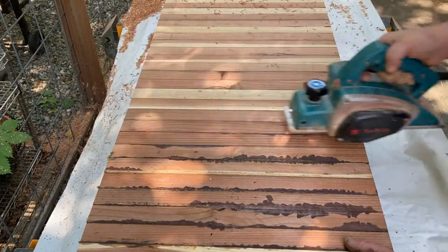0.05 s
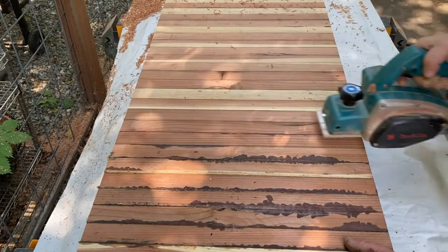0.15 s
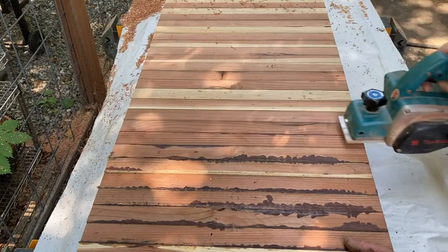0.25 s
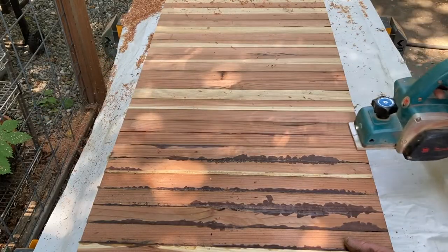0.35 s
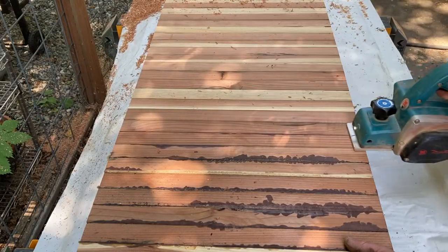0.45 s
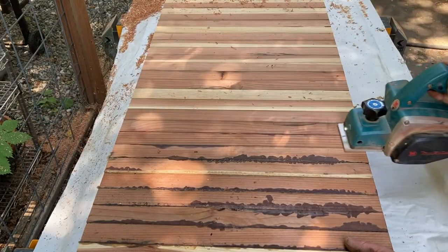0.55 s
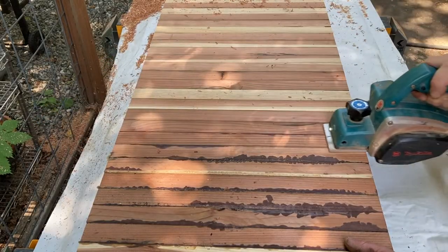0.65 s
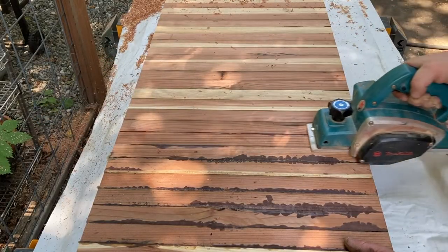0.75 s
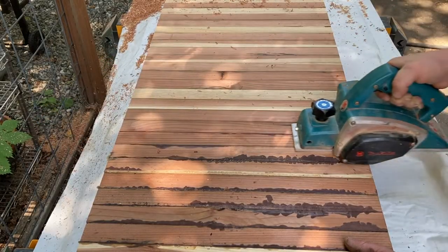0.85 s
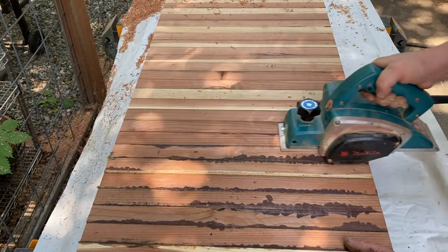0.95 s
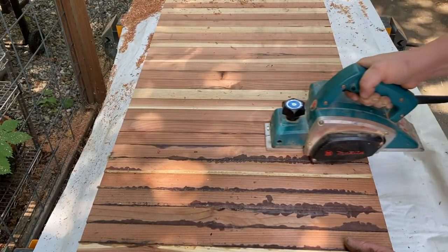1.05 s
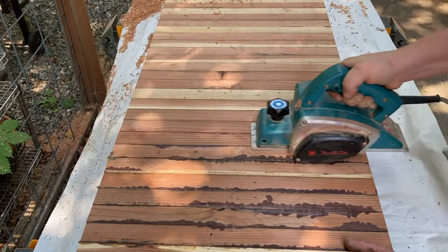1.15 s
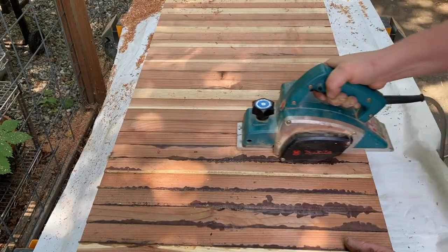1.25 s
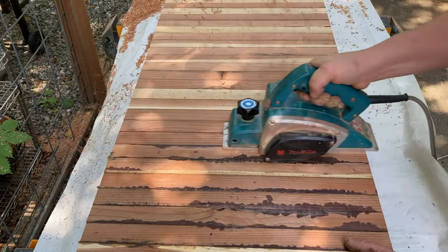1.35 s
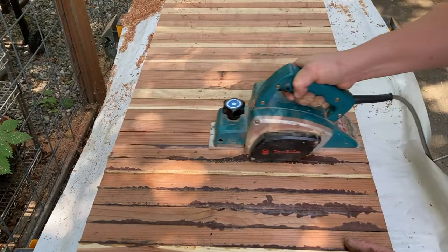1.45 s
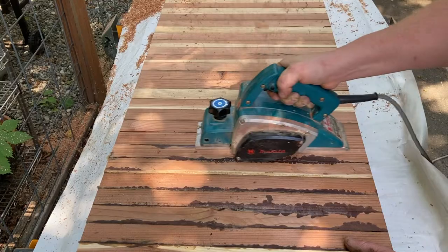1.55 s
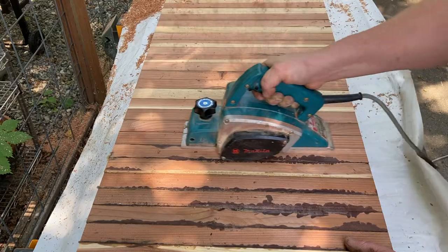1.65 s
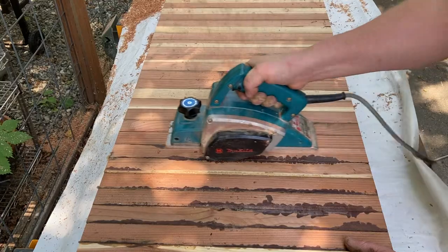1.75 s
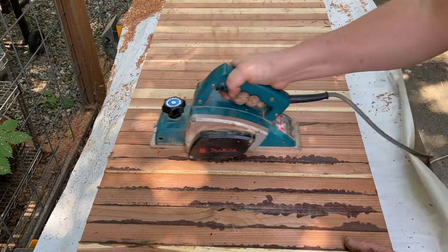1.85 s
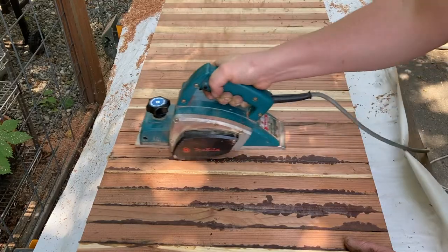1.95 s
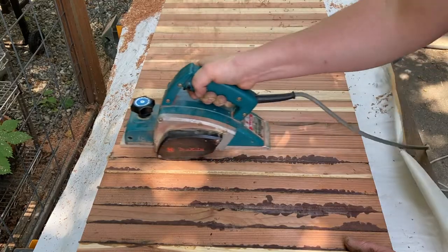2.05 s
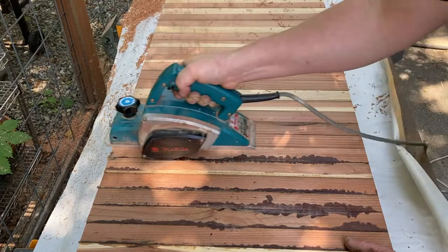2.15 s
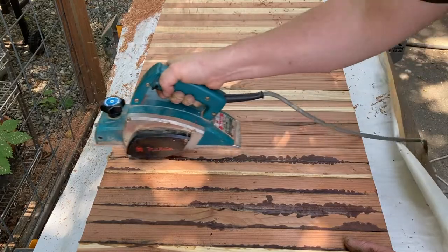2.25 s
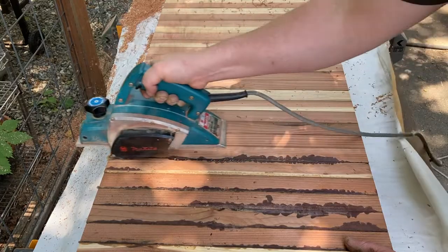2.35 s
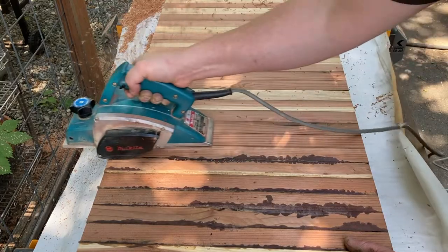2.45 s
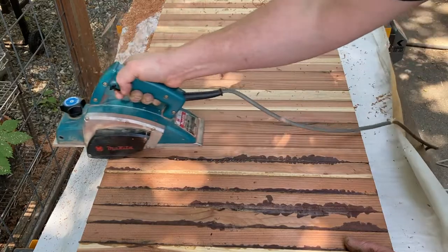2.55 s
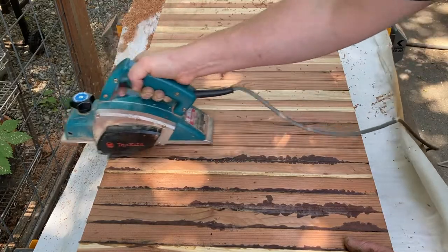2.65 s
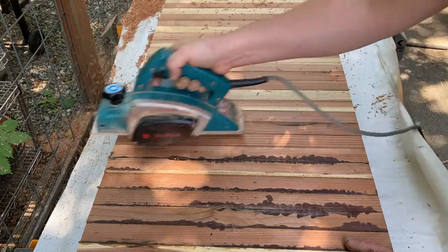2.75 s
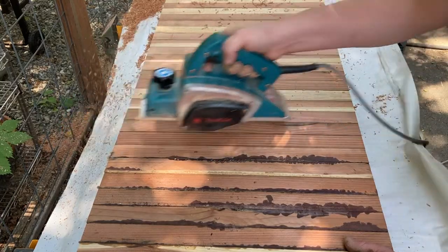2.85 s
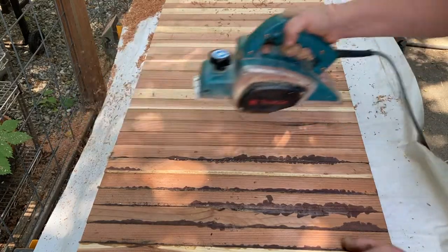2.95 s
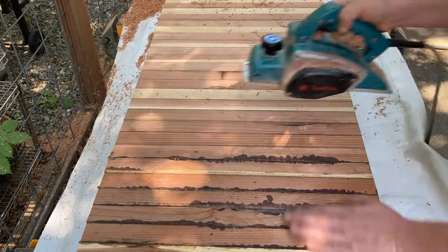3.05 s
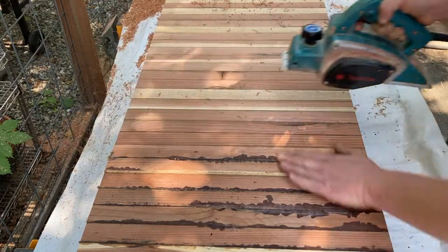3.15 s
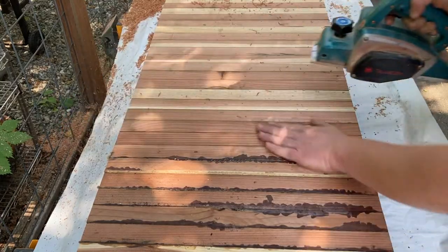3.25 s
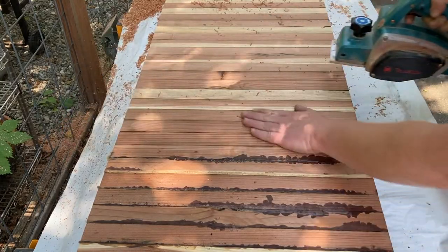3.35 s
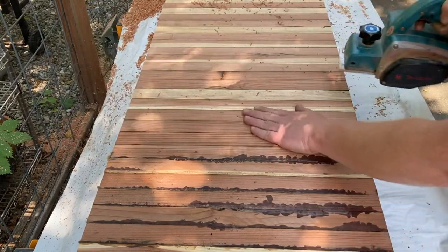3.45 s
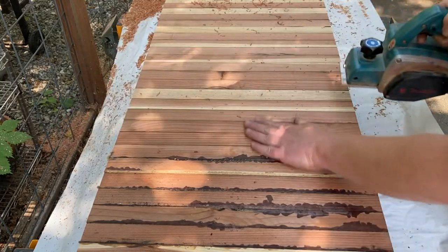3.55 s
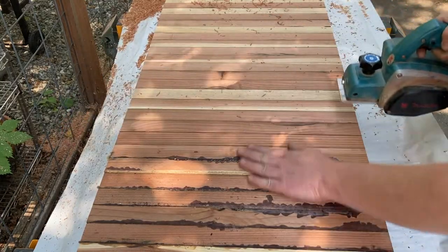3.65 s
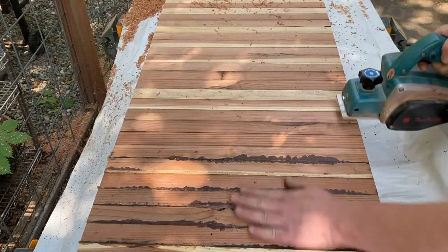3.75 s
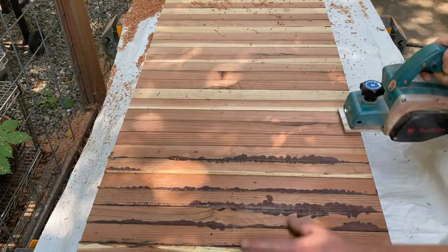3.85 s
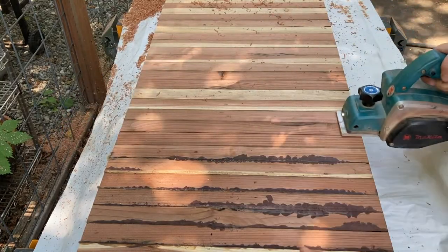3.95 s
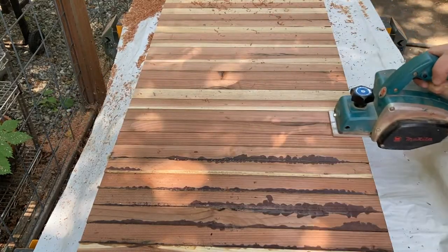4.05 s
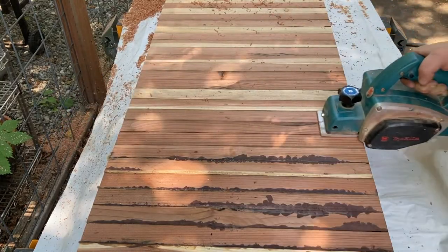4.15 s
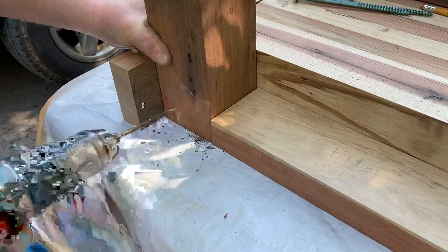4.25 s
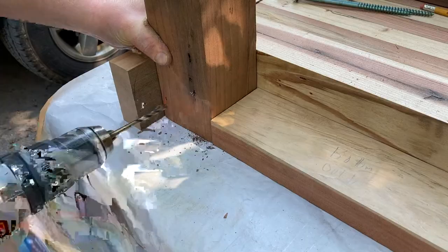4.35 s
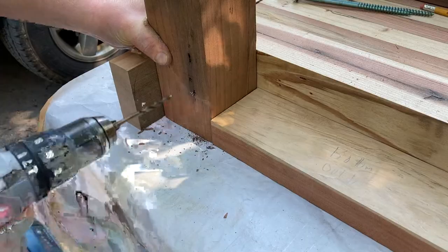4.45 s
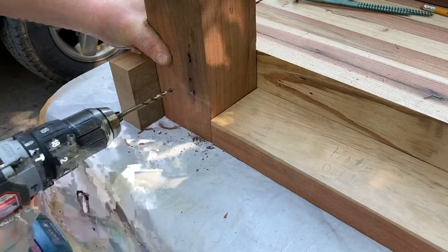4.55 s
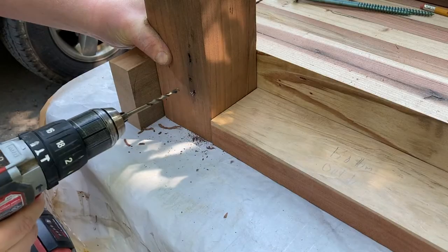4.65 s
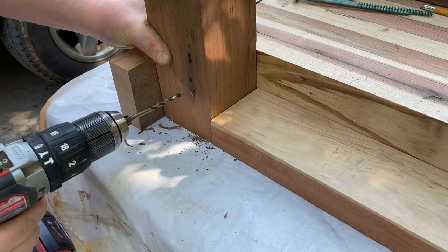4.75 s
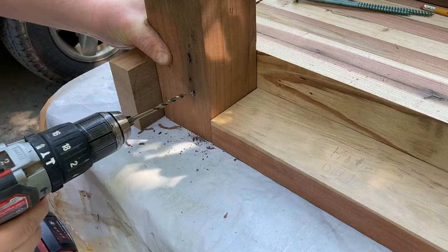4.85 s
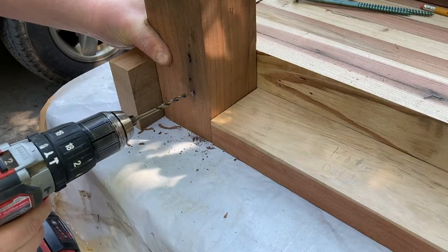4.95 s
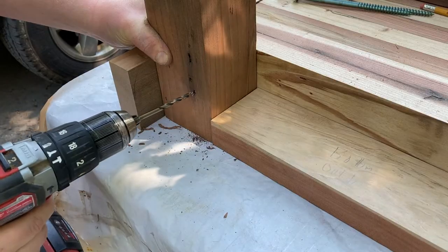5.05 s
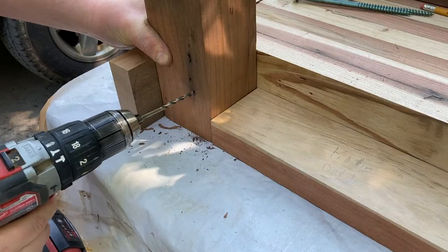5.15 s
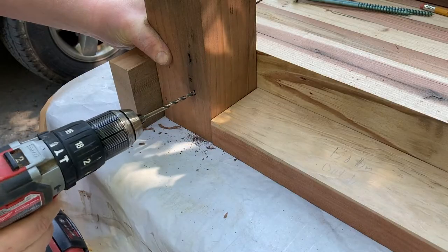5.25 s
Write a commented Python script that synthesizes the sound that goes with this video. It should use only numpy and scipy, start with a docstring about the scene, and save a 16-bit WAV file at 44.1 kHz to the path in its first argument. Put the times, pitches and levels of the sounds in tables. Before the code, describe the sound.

Close stereo pickup outdoors with faint low rumble. An electric planer is already spinning down, is switched on and rises to a steady buzzing whine, then cuts wood with a loud bright rasp for nearly two seconds. It leaves the plank, coasts downward in pitch, and revs briefly with a throbbing squeal before an abrupt cut to a drill braking in rapid metallic clicks.

```python
"""Hand planer and braking drill outdoors

A hand planer coasts, is switched on, shaves across a plank, coasts and is briefly powered again.
Two knives on its drum chop air and wood as harmonics of the drum's rotation; its belted motor hums
and whines at multiples of the shaft speed, and its fan is coloured noise. Then a cordless drill brakes
to a halt: gear tones sink, noise whirrs, and knocks excite damped modes of the chuck.
Filtered noise makes the far rumble, which is left at the end."""
import sys
import numpy as np
from scipy import signal
from scipy.fft import rfft, irfft
from scipy.io import wavfile
from scipy.ndimage import uniform_filter1d

SR = 44100
rng = np.random.default_rng(int(sys.argv[2]) if len(sys.argv) > 2 else 0)


def wav_out(sig):
    """Save sig, one row per channel (or a flat mono array), as 16-bit PCM at SR to the path in sys.argv[1]."""
    wavfile.write(sys.argv[1], SR, np.round(np.clip(np.atleast_2d(sig).T, -1, 1) * 32767).astype(np.int16))


N = 234345
T = np.arange(N) / SR  # time in seconds

# Far rumble. Each row: time in seconds, level in dB.
RUMBLE_LEVEL = [(0, -76), (.6, -69.5), (2.9, -74), (3.3, -68.5), (3.9, -69), (4.2, -65), (4.301, -64),
                (5.31, -63.5)]
# Colour of the open air. Each row: frequency in Hz, relative density in dB.
OUTDOORS_COLOUR = [(20, -44), (35, -16), (60, -2), (85, 3.5), (120, -6), (160, -13.5), (250, -29),
                   (500, -36), (1000, -43), (2000, -50), (3500, -67), (6000, -74), (16000, -85)]

# Drill running down. Each row: time in seconds, whirr level in dB.
DRILL_WHIRR = [(4.276, -46), (4.335, -46), (4.362, -46), (4.376, -54), (4.385, -50), (4.408, -49),
               (4.42, -51), (4.44, -49), (4.45, -70), (4.6, -93), (4.8, -110)]
# Colour of the whirr. Each row: frequency in Hz, relative density in dB.
WHIRR_COLOUR = [(120, -51.5), (200, -7), (659, -10), (1500, -7.5), (2470, -6), (4600, 1), (8420, -5.5),
                (9060, -2), (10300, 3), (14600, -9), (16000, -21)]
# Gear partials. Each row: multiple of the tooth-mesh frequency, level in dB.
GEAR_PARTIALS = [(1, -66), (2, -65), (3, -62), (4, -54), (6, -54), (8, -59)]
# Gear knocks and ticks. Each row: start in seconds, relative strength in dB, nominal pitch in Hz.
GEAR_KNOCKS = [(4.342, -39, 6000), (4.354, -45, 5000), (4.358, -39, 3500), (4.383, -46, 5000),
               (4.391, -47, 4500), (4.402, -46, 8000), (4.411, -46, 4000), (4.415, -46, 10500),
               (4.424, -46, 5000), (4.431, -44, 7000), (4.438, -47, 7000), (4.489, -65, 10000),
               (4.553, -75, 9000), (4.562, -75, 9000), (4.606, -80, 8500), (4.633, -83, 6500),
               (4.642, -70, 11500), (4.667, -77, 10000), (4.761, -69, 10500)]
# Modes of the chuck. Each row: frequency in Hz, level in dB relative to the knock, 60 dB decay in seconds.
CHUCK_MODES = [(4550, -4, .13), (8300, -4, .05), (10000, -24, .2), (10800, -23, .4), (13100, -3, .05),
               (3600, -20, .02)]
MESH_HZ, MESH_SAG_HZ_PER_S = 1798, 1067  # tooth mesh at the start, and its fall
GEARS_STOP_S = 4.342
BRAKE_S = (4.385, 4.45)  # only the knocks of the final stop ring the chuck
THUD_HZ, THUD_DB, THUD_S = (250, 1800), 2, .005  # housing thump: range, gain before its filter, decay time

# Drum. Each row: time in seconds, turns per second, once-a-turn shake in dB, fan hiss in dB.
DRUM_MOTION = [(0, 232.4, -98, -49), (.4, 207, -79, -49), (.512, 198, -57.5, -48),
               (.59, 214.6, -47.5, -46.5), (.794, 240, -47, -45.5), (.85, 245.5, -43, -40.5),
               (1.0, 250, -37.5, -41.5), (1.2, 251.4, -43, -39.5), (1.33, 249.8, -51.5, -42),
               (1.7, 242.6, -51.5, -43), (2.345, 228.5, -65, -46.5), (2.555, 223, -73, -50),
               (2.585, 229.5, -64, -50), (2.615, 232.5, -70, -50.5), (2.94, 213.7, -80.5, -47.5),
               (3.4, 187, -79, -51), (3.962, 160.7, -74.5, -51.5), (4.065, 180, -66.5, -49.5),
               (4.16, 203, -47, -48.5), (4.28, 224, -50, -47)]
# Colour of the fan. Each row: frequency in Hz, relative density in dB.
FAN_COLOUR = [(59, -58.5), (100, -41), (239, -12.5), (398, -4), (621, -8.5), (836, -20), (930, -14.5),
              (1310, -13.5), (2040, -15.5), (3500, -17.5), (5300, -14), (7000, -19), (9210, -15),
              (10700, -14.5), (16000, -21)]
# Knife partials. Each row: multiple of the drum speed, dB over the fan in free air before the speed law,
# dB over the sole's ring in the wood.
KNIFE_PARTIALS = [(2, -2, -39), (3, -21, -19.5), (4, -12.5, -15), (6, -11, -23), (8, -17, -5.5),
                  (10, -21, 1), (12, -35.5, -5), (14, -29.5, -8), (16, -28, -4.5)]
# Faint wavering drum partials. Each row: multiple of the drum speed, dB over the fan.
FAINT_PARTIALS = [(24, -45), (32, -32)]
# Drum, motor and cut partials swell or sink briefly around a given time and pitch.
# Each row: centre in seconds, centre in Hz, Gaussian spread in seconds, peak change in dB.
TONE_SWELLS = [(0.06, 1318, 0.026, 18), (0.182, 1718, 0.1, 12.5), (0.725, 690, 0.12, 16.5),
               (0.907, 1982, 0.07, -8.5), (0.924, 2500, .06, 1), (0.925, 2950, 0.081, -8),
               (1.071, 6360, 0.069, 12), (0.893, 4170, 0.028, 7), (0.902, 6760, 0.047, -3.5),
               (1.399, 5800, .1, -5), (1.559, 7100, 0.079, 2.5), (2.385, 3230, 0.085, 2),
               (2.781, 5500, .13, 14), (3.298, 5750, 0.087, 10), (3.75, 5200, .17, 8),
               (0.096, 920, 0.11, 6.5), (2.0, 4370, 0.23, -8), (2.532, 2120, 0.035, 1),
               (2.538, 2840, 0.048, -1), (3.2, 3300, .05, 18), (1.0, 496, 0.65, -5),
               (1.157, 1520, 0.15, -13.5), (1.193, 2300, 0.14, -13.5), (1.3, 3570, 0.081, -21.5),
               (1.26, 1260, 0.071, 11.5), (1.323, 3043, 0.36, 8.5), (1.33, 10600, 0.031, 5),
               (1.497, 11100, 0.02, 9), (1.92, 10600, 0.0426, 7.5), (1.887, 1440, 0.14, 3),
               (1.847, 912.4, 0.18, -19), (1.855, 3107, 0.2, 14.5), (1.862, 1620, 0.21, 12),
               (2.092, 2700, 0.091, -20), (2.366, 1370, 0.16, 13.5), (2.43, 6600, 0.077, 10),
               (2.514, 10400, 0.034, 11), (2.2, 3700, 0.14, -6), (2.298, 2320, 0.19, -13),
               (2.46, 1548, 0.14, -16), (2.46, 1940, 0.2, 8.5), (2.83, 1800, 0.044, 10),
               (2.833, 1325, 0.1, 12.5), (2.98, 854.7, 0.19, 11), (3.119, 2820, .16, 18.5),
               (3.1, 1568, 0.25, 13), (3.201, 2410, 0.16, 12), (3.55, 2195, 0.16, 15.5),
               (3.699, 2400, 0.22, 9), (3.238, 1180, 0.08, 13.5), (4.125, 1090, 0.18, 8),
               (4.22, 643, 0.23, 13)]
SWELL_OCTAVES = 0.065  # Gaussian spread in pitch
MUFFLE_DB = -4  # the plank covers the open sole and damps the fan
CHOP_DB_PER_OCTAVE = 7.5  # a slower drum chops the air more softly

# Trigger held. Each row: on in seconds, off in seconds, initial throb depth (0-1), initial squeal in dB.
TRIGGER_PULLS = [(.52, 2.62, .2, 0), (3.976, 4.3, 1., 18)]
# Motor whine. Each row: time in seconds, dB over the fan before the starting squeal.
WHINE_LEVEL = [(0, -20), (.1, -14), (.18, -15), (.24, -5), (.45, -8), (.5, -16), (.55, -6), (.68, -6),
               (.8, -11), (.9, -16), (2.57, -18), (2.6, -3), (2.7, -4), (2.82, -12), (2.93, -7), (3.0, -15),
               (3.15, -11), (3.5, -11), (3.7, -8), (3.9, -11), (3.96, -16), (4.0, -11), (4.07, -14),
               (4.12, -10), (4.2, -14), (4.28, -9)]
# Faint motor partials. Each row: multiple of the shaft speed, dB over the fan.
SHAFT_PARTIALS = [(7, -28), (14, -28), (17, -26)]
BELT, SLOTS = 1.742, 12  # motor turns per drum turn before slip, armature slots
SLIP_COAST, SLIP_DRIVEN, SLIP_START = .8, .3, -1.5  # shaft-speed offset in %; the last is per unit of throb
GRIP_S, SQUEAL_S = .13, .075  # settling times of throb and squeal
HUM_DB, HUM_DRIVEN_DB, HUM_RISE_S = -71.5, 17.5, .2  # coasting hum, gain at full power, time constant
THROB_HZ = 120  # twice the mains

# Knives in the wood. Each row: time in seconds, then dB of the plank's knock, of the sole's ring
# and of the edge's snap, all before the tone shaping below.
CUT_LEVELS = [(.841, -73, -46, -36.5), (.92, -77, -44, -42.5), (1.08, -54, -43, -42),
              (1.33, -42.5, -42, -41), (1.5, -39, -47, -42), (1.65, -48.5, -47, -44),
              (1.92, -57, -48, -41.5), (2.05, -50.5, -50, -42.5), (2.19, -40, -55, -45.5),
              (2.33, -53, -49, -41), (2.42, -44, -50, -41), (2.5, -47.5, -45.5, -42),
              (2.559, -50, -45.5, -40.5)]
# Centres of those three ranges, in Hz.
CUT_CENTRES_HZ = [1000, 3900, 7000]
# Tone of the blows. Each row: frequency in Hz, gain in dB.
CUT_COLOUR = [(600, -17), (1500, 5.5), (2200, 11), (3000, -1), (3600, 4.5), (4500, 0), (5200, 0.5),
              (6000, -2.5), (8500, 0.5), (11000, 4), (13500, 0), (15800, -4)]
# Imbalance of the knives. Each row: frequency in Hz, second knife's share of the first one's blow.
SECOND_KNIFE_SHARE = [(600, .5), (2000, .65), (3600, .55), (4500, .2), (6000, .25), (8000, .1), (15000, .1)]
# Colour of flying chips. Each row: frequency in Hz, relative density in dB.
CHIPS_COLOUR = [(200, -13.5), (400, 0), (900, -2), (1500, -5.5), (2200, -2.5), (3500, -10.5), (5000, -10),
                (6000, -13), (7500, -7), (10000, 2.5), (16000, -15)]
# The sole chatters as it leaves the plank: time constant, turns of jitter, dB of scatter between blows.
EXIT_S, EXIT_JITTER, EXIT_DB = .05, .003, 3
PATCHY_DB, CHIPS_DB = 2.0, -9.0  # scale of the partials' random flicker; chips relative to the edge's snap

# Phase between the two ports. Each row: frequency in Hz, turns by which the right leads.
PORT_PHASE = [(4000, .3), (4650, .37), (5450, .5), (6700, .97), (7490, 1.08), (9200, 1.5), (11200, 2),
              (13600, 2.5), (15400, 3)]
SPLIT_HZ, TOP_HZ = 4800, 15900  # middle of the crossover into shared treble, top cutoff


def undb(db):
    """Decibel law: convert a level to an amplitude gain."""
    return 10 ** (np.asarray(db) / 20)


def read(table, edge_s=0.0015):
    """Linear interpolation: columns of a curve at every sample, and a gate open while it lasts."""
    s, *columns = np.transpose(table)
    opening = (T - s[0]) / edge_s + (s[0] <= 0)  # already open if the curve starts at zero
    closing = (s[-1] - T) / edge_s + 1
    gate = np.clip(np.minimum(opening, closing), 0, 1)
    return [np.interp(T, s, c) for c in columns], gate


def at_hz(hz, points):
    """Logarithmic pitch scale: interpolate a spectrum on a log-frequency axis."""
    f, values = np.transpose(points)
    return np.interp(np.log(np.maximum(hz, 1)), np.log(f), values)


def walk(rate, count=1, size=N):
    """Slow random modulation: normal levels held for 1 / rate s, slewed by a moving average."""
    hold = int(SR / rate)
    levels = rng.standard_normal((count, size // hold + 1))
    return 1.15 * uniform_filter1d(np.repeat(levels, hold, 1), hold)[:, :size]


def hiss(points, wide_hz):
    """Spatial coherence: a coloured noise pair of rms 1, alike in the bass and unrelated well above wide_hz."""
    hz = np.fft.rfftfreq(N, 1 / SR)
    mid, side = rfft(rng.standard_normal((2, N))) * undb(at_hz(hz, points))
    side = side * (0.061 + hz ** 2 / (hz ** 2 + wide_hz ** 2))
    pair = irfft(np.array([mid + side, mid - side]), N)
    return pair / np.sqrt(np.mean(pair ** 2))


def tone(turns, db, pan_db):
    """Simple harmonic motion: a sine of rms level db, louder on the left by pan_db."""
    balance_db = np.array([[.5], [-.5]]) * pan_db
    return np.sqrt(2) * np.cos(2 * np.pi * turns) * undb(db + balance_db)


def swell(t, hz, step=256):
    """Selective gain: Gaussian patches in time and log pitch, in dB, for a tone of pitch hz at times t."""
    s, centre, spread_s, db = np.transpose(TONE_SWELLS)[:, :, None]
    slow_t, slow_hz = t[::step], hz[::step]
    in_time = ((slow_t - s) / spread_s) ** 2
    in_pitch = (np.log2(slow_hz / centre) / SWELL_OCTAVES) ** 2
    return np.interp(t, slow_t, (db * np.exp(-.5 * (in_time + in_pitch))).sum(0))


def outdoors():
    """Broadband ambience: low-weighted noise under a slow level curve makes the far rumble."""
    (rumble_db,), _ = read(RUMBLE_LEVEL)
    return hiss(OUTDOORS_COLOUR, 545.2) * undb(rumble_db)


def gear_knock(pitch_hz, rings_chuck, luck, crack, t):
    """Impact excitation: a filtered crack and housing thump, with damped chuck modes if rings_chuck."""
    hit = np.zeros(len(t))
    if rings_chuck:
        for (hz, db, t60), (level, phase) in zip(CHUCK_MODES, luck):
            mode = np.sin(2 * np.pi * hz * t + 9 * phase) * 1000 ** (-t / t60)
            hit += undb(db + 2 * level) * mode
    band = signal.butter(2, [pitch_hz / 1.6, pitch_hz * 1.35], "band", fs=SR)
    housing = signal.butter(2, THUD_HZ, "band", fs=SR)
    short = t[:len(crack)]
    hit[:len(crack)] += 2.6 * signal.lfilter(*band, crack * np.exp(-short / .002))
    thump = signal.lfilter(*housing, crack[::-1] * np.exp(-short / THUD_S))
    hit[:len(crack)] += undb(THUD_DB) * thump
    return hit


def drill():
    """Tooth-mesh harmonics: gear tones sink and stop; knocks follow over a dying whirr."""
    (whirr_db,), gate = read(DRILL_WHIRR, edge_s=0.0018)
    mesh_hz = MESH_HZ - MESH_SAG_HZ_PER_S * np.clip(T - DRILL_WHIRR[0][0], 0, 1)
    mesh_turns = np.cumsum(mesh_hz * (1 + .006 * walk(300)[0])) / SR
    gears = sum(tone(k * mesh_turns + rng.random(), db + 2.5 * walk(120), .1) for k, db in GEAR_PARTIALS)
    gears = gears * (T < GEARS_STOP_S)
    whirr = hiss(WHIRR_COLOUR, 1500.) * undb(whirr_db + 1.5 * walk(200))
    out = gate * (gears + whirr)
    t = T[:SR // 2]
    chance = rng.standard_normal((len(GEAR_KNOCKS), len(CHUCK_MODES), 2))
    cracks = rng.standard_normal((len(GEAR_KNOCKS), 1600))
    for (s, db, pitch_hz), luck, crack in zip(GEAR_KNOCKS, chance, cracks):
        hit = gear_knock(pitch_hz, BRAKE_S[0] < s < BRAKE_S[1], luck, crack, t)
        i = int(s * SR)
        out[:, i:i + len(t)] += undb(db) * hit[:N - i]
    return out


def trigger():
    """Starting transient: power (0-1), belt slip in %, throb (0-1), squeal in dB; the last two jump, then settle."""
    on, off, throb, squeal_db = np.transpose(TRIGGER_PULLS)[:, :, None]
    held = (T >= on) & (T < off)
    since = np.maximum(T - on, 0)
    power = (held * (1 - np.exp(-since / HUM_RISE_S))).sum(0)
    throb = (held * throb * np.exp(-(since / GRIP_S) ** 2)).sum(0)
    slip = np.where(held.any(0), SLIP_DRIVEN + SLIP_START * throb, SLIP_COAST)
    squeal_db = (held * squeal_db * np.exp(-(since / SQUEAL_S) ** 4)).sum(0)
    return uniform_filter1d(np.array([power, slip, throb, squeal_db]), size=600)


def motor(drum_hz, fan_db):
    """Slot-passing tone: the belted armature hums once a turn and whines once a slot."""
    power, slip, throb, squeal_db = trigger()
    shaft_hz = BELT * drum_hz * (1 + slip / 100)
    whine_db = fan_db + read(WHINE_LEVEL)[0][0] + squeal_db
    uneven = (.001 + .001 * power) * walk(80)[0]
    slots = SLOTS * np.cumsum(shaft_hz * (1 + uneven)) / SR
    # brushes roughen the whine; the starting current makes it throb
    slots = slots + (.06 + .03 * throb) * walk(400)[0]
    whine = tone(slots + np.array([[0], [.3]]), whine_db + 2.3 * walk(35), 6.0)
    whine = whine * (1 + throb * np.cos(2 * np.pi * THROB_HZ * T))
    whine = whine + tone(2 * slots, whine_db - 14 + 3.6 * walk(36), 0.126)
    for k, db in SHAFT_PARTIALS:
        level_db = fan_db + db + swell(T, k * shaft_hz) + 3.5 * walk(20)
        whine = whine + tone(k / SLOTS * slots, level_db, 2)
    hum = tone(np.cumsum(shaft_hz) / SR, HUM_DB + HUM_DRIVEN_DB * power + 1.5 * walk(5), .1)
    return hum + whine


def knife_chop(hz, turns, shake_db, fan_db):
    """Rotational harmonics: knives chop the air twice a turn, and the wood strengthens their partials."""
    (_, ring_db, _), in_wood = read(CUT_LEVELS, edge_s=0.0071)
    flutter = 1.6 * walk(25, count=len(KNIFE_PARTIALS))
    swing = walk(1.6, count=len(KNIFE_PARTIALS))
    air_db = fan_db + CHOP_DB_PER_OCTAVE * np.log2(hz / hz.max())
    chop = tone(turns + np.array([[.01], [-.01]]), shake_db + walk(30), 0)
    for (k, free_db, wood_db), f, s in zip(KNIFE_PARTIALS, flutter, swing):
        # the phase gap between ports widens up to the fifth multiple, then stays, wavering slowly
        lead = .07 * np.sqrt(min(k, 5) - .9) * (1 + .5 * s) * np.array([[-.5], [.5]])
        size = undb(air_db + free_db) + in_wood * undb(ring_db + wood_db)
        phase = k * turns + rng.random() + lead
        chop = chop + size * tone(phase, swell(T, k * hz) + f, min(.5 * (k - 1), 3.5))
    for k, db in FAINT_PARTIALS:
        chop = chop + tone(k * turns, fan_db + db + swell(T, k * hz) + 4 * walk(5.0), 1.9)
    return chop


def fan_hiss(turns, fan_db):
    """Turbulence noise: fan hiss pulses once a drum turn and is damped by the plank."""
    _, in_wood = read(CUT_LEVELS, edge_s=0.0071)
    level_db = fan_db + MUFFLE_DB * in_wood + .8 * walk(12)
    return hiss(FAN_COLOUR, 1500.) * undb(level_db) * (1 + .15 * np.cos(2 * np.pi * turns))


def cutting(hz, turns):
    """Periodic impacts: both knives strike each turn; random flicker colours the blows, chips spray after."""
    levels, gate = read(CUT_LEVELS, edge_s=.004)
    on = slice(*np.flatnonzero(gate)[[0, -1]])
    t, turns, edge_db = T[on], turns[on], levels[2][on]
    # colour changes slowly: work it out at every 64th sample
    slow, hz = t[::64], hz[on][::64]
    levels = np.array(levels)[:, on][:, ::64]
    orders = np.setdiff1d(np.arange(3, 71), [row[0] for row in KNIFE_PARTIALS])
    flicker = walk(64 * 13.0, count=len(orders) + 4, size=len(slow))
    # no two blows land exactly on time
    leaving = np.exp(np.minimum(t - CUT_LEVELS[-1][0], 0) / EXIT_S)
    turns = turns + (.0007 + EXIT_JITTER * leaving) * walk(150)[0, on]
    sides = walk(64 * 6.1, count=len(orders), size=len(slow))
    # each range of the blow arrives a little earlier or later than its neighbours (turns)
    arrival = np.cumsum(.2 * uniform_filter1d(rng.standard_normal(len(orders)), size=5))
    out = np.zeros((2, N))
    every = np.arange(len(slow))
    for i, k in enumerate(orders):
        f = k * hz
        # blend the levels of the two nearest ranges
        place = np.interp(np.log(f), np.log(CUT_CENTRES_HZ), np.arange(3))
        low = np.minimum(place.astype(int), 1)
        below, above = levels[low, every], levels[low + 1, every]
        db = below + (place - low) * (above - below)
        db = db + swell(slow, f, step=1) + at_hz(f, CUT_COLOUR)
        # more partials share a range the higher it lies; neighbours flicker together
        db = db - 10 * np.log10(0.6 * k)
        db = db + PATCHY_DB * (0.65 * flicker[i] + .5 * flicker[i:i + 5].sum(0))
        # half a turn apart, the blows add in even orders and oppose in odd ones
        knives = 1 + (-1) ** k * at_hz(f, SECOND_KNIFE_SHARE)
        # scattered phases spread each blow into a short ring
        spread = (1 - .7 * leaving[::64]) * arrival[i] + .08 * rng.standard_normal() + .06 * flicker[i + 2]
        lead = 0.22 * sides[i] * np.array([[.5], [-.5]])
        balance_db = np.array([[.5], [-.5]]) * (2.5 + 3.0 * sides[i])
        size = knives * (f < .45 * SR) * undb(db + balance_db)
        for channel, gain, phase in zip(out, size, spread + lead):
            wave = np.cos(2 * np.pi * (k * turns + np.interp(t, slow, phase)))
            channel[on] += np.interp(t, slow, np.sqrt(2) * gain) * wave
    spray = 0.97 + np.exp(-(2 * turns % 1) / 6.0)
    out[:, on] += hiss(CHIPS_COLOUR, 1800.0)[:, on] * spray * undb(edge_db + CHIPS_DB)
    out[:, on] *= undb((.5 + EXIT_DB * leaving) * walk(200)[0, on])
    return gate * out


def planer():
    """Shared rotation: one drum speed sets the pitch of the knives, motor and cut."""
    (hz, shake_db, fan_db), gate = read(DRUM_MOTION)
    turns = np.cumsum(hz) / SR
    running = knife_chop(hz, turns, shake_db, fan_db) + motor(hz, fan_db) + fan_hiss(turns, fan_db)
    return gate * running + cutting(hz, turns)


def scene():
    """Superposition: the open air, the drill and the planer add."""
    return outdoors() + drill() + planer()


def record(dry):
    """Interaural-style phase: treble is nearly one sound, the right port leading; the top is cut."""
    hz = np.fft.rfftfreq(N, 1 / SR)
    left, right = rfft(dry)
    treble = np.clip((hz - SPLIT_HZ) / 2000 + .5, 0, .985)
    ahead = left * np.exp(2j * np.pi * np.interp(hz, *np.transpose(PORT_PHASE)))
    right = np.sqrt(1 - treble ** 2) * right + treble * ahead
    pair = irfft(np.array([left, right]), N)
    top_cut = signal.ellip(12, .2, 80, TOP_HZ, fs=SR, output="sos")
    return signal.sosfilt(top_cut, pair)


dry = scene()
out = record(dry)
wav_out(out)
```